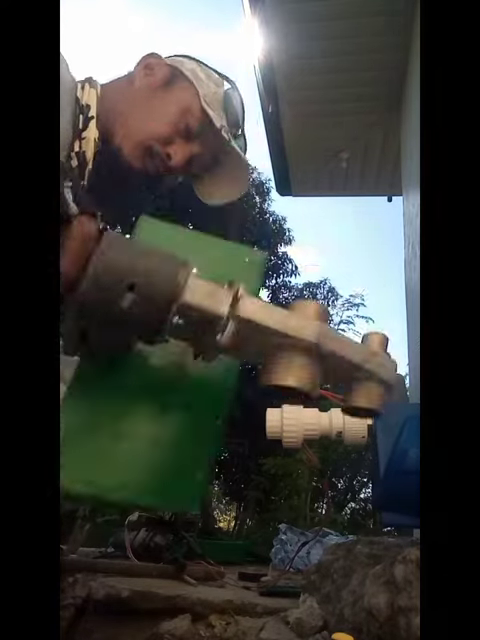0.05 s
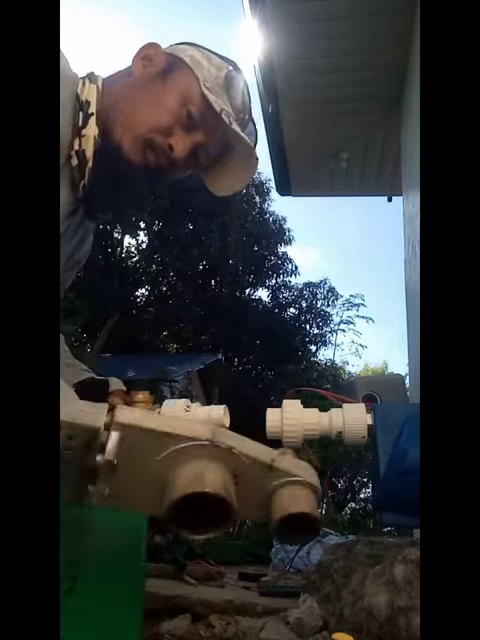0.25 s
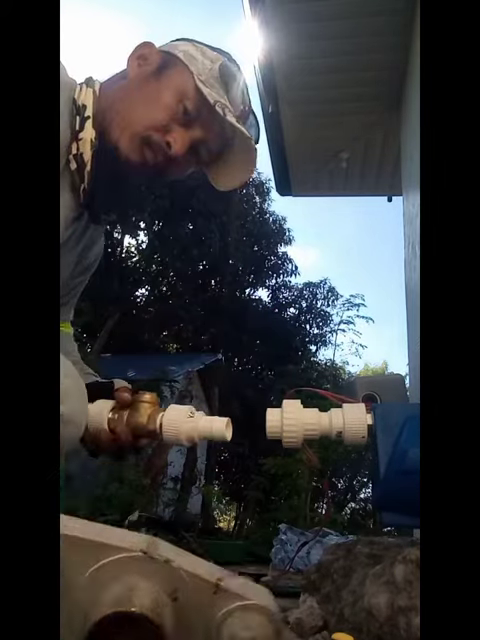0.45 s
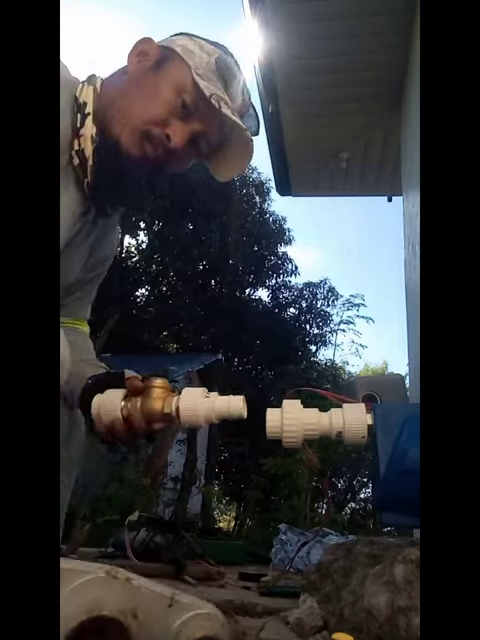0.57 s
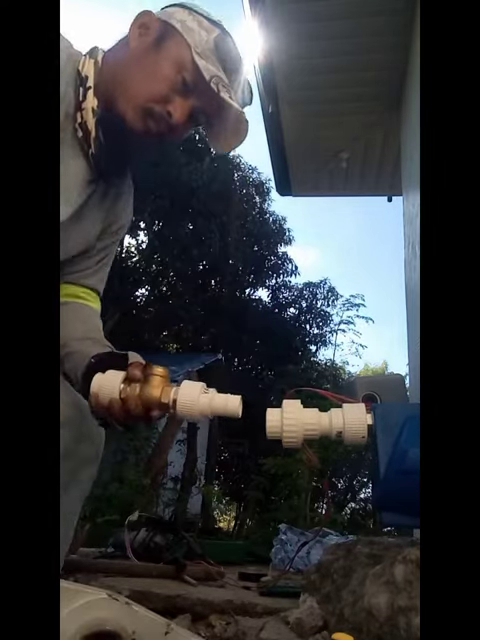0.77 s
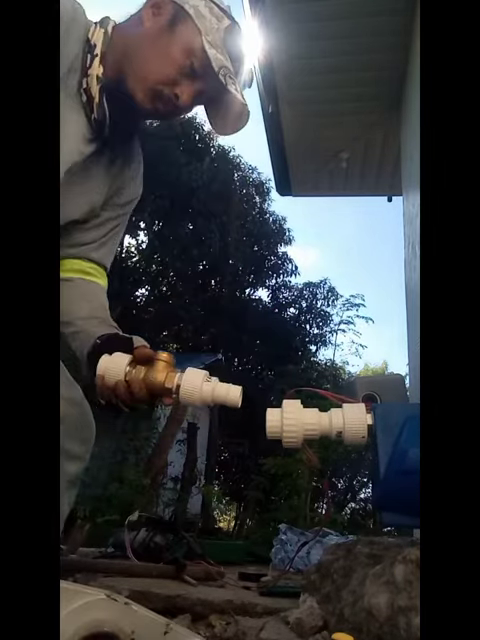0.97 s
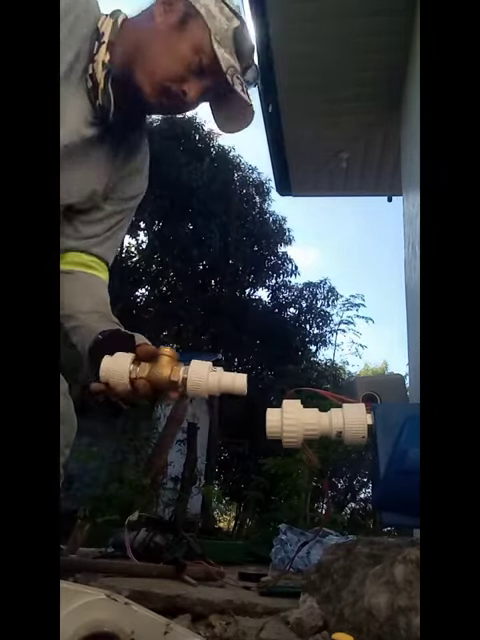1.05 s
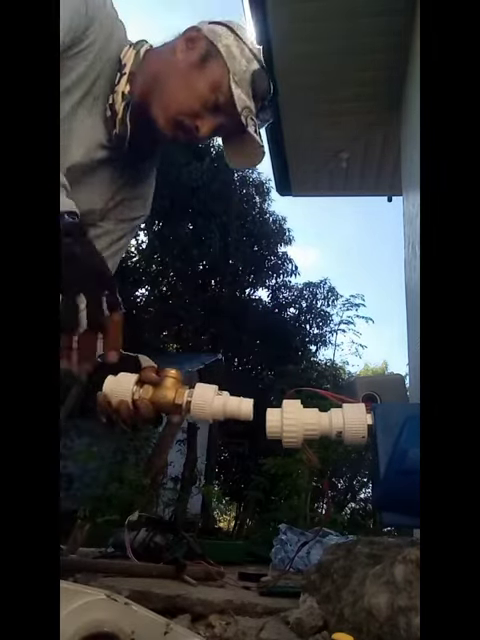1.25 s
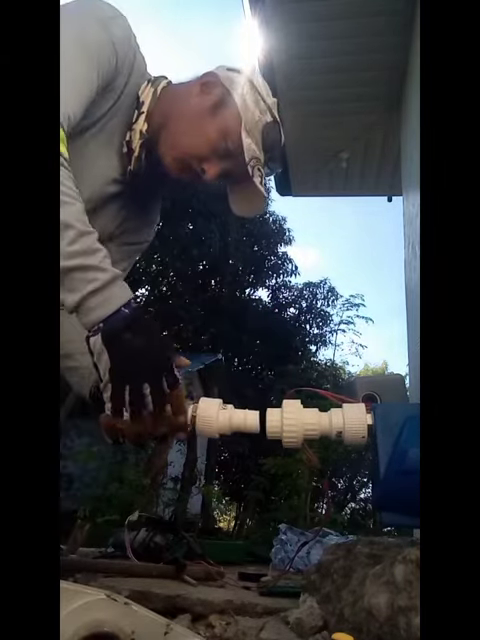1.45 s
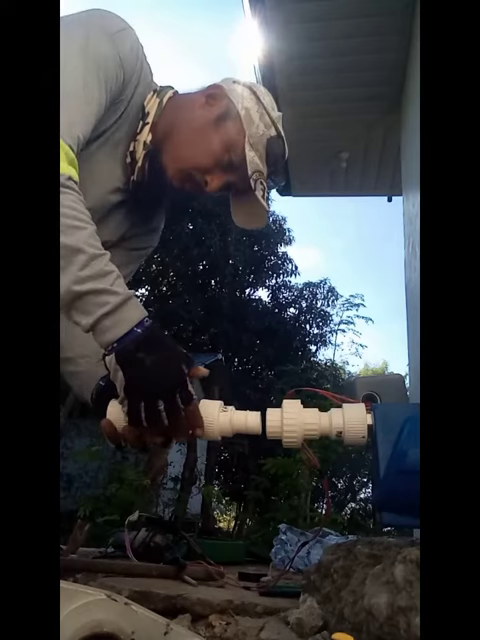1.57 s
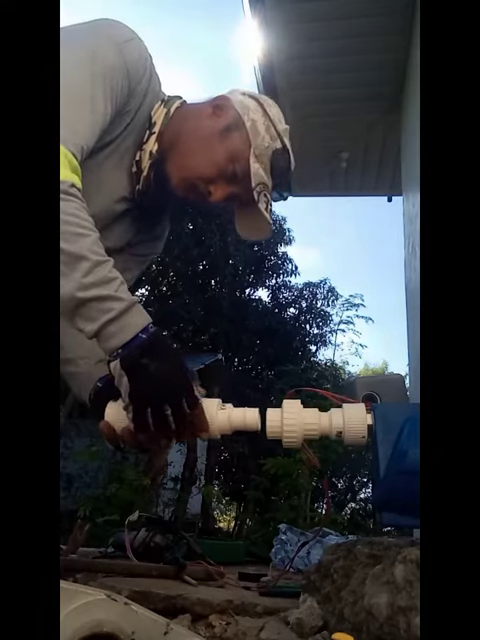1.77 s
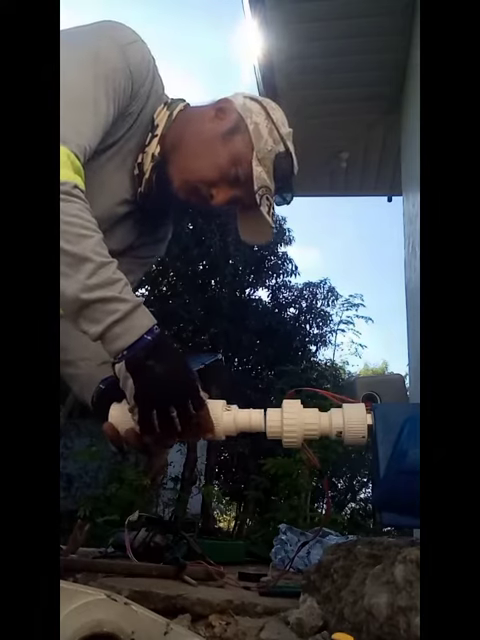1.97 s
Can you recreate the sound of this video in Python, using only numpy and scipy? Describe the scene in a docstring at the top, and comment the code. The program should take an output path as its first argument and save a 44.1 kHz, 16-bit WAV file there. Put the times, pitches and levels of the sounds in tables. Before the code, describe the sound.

Hard clattering knocks as a metal tool is set down among plastic pipes, over a faint engine hum

```python
"""A yard: a metal pipe-welding tool is set down among plastic pipes and fittings.
A light knock, two hard clatters, then smaller knocks: contacts crack and ring tool and pipes.
A far one-cylinder engine idles as a throbbing hum: regular firings through exhaust resonances.
A bird whistles twice and faint calls sound further off: wavering tones on pitch and level curves.
Behind lie shaped noise, a hiss that comes and goes, and a thin whine made of upper harmonics."""
import sys
import numpy as np
from scipy import signal
from scipy.fft import rfft, irfft
from scipy.io import wavfile

SR = 44100
rng = np.random.default_rng(int(sys.argv[2]) if len(sys.argv) > 2 else 0)


def unload_audio(sound):
    """Save the sound as a 16-bit wav file, at the path given as the first command line argument."""
    columns = np.transpose(np.atleast_2d(sound))
    # keep every value between -1 and 1, then stretch to whole-number steps
    steps = np.round(np.clip(columns, -1, 1) * 32767)
    wavfile.write(sys.argv[1], SR, steps.astype(np.int16))


N = 88200
T = np.arange(N) / SR


def from_db(db):
    """Decibels to amplitude gain."""
    return 10 ** (np.asarray(db) / 20)


def unit_energy(x):
    """Scale to an energy of one."""
    return x / np.sqrt(np.sum(x ** 2) + 1e-20)


def unit_rms(x):
    """Scale to an rms of one."""
    return unit_energy(x) * np.sqrt(len(x))


def decay(t60_s):
    """Exponential fade by 60 dB in t60_s."""
    return np.exp(-np.log(1000) * T / t60_s)


def convolve(x, response):
    """Play x through an impulse response."""
    return signal.fftconvolve(x, response)[:len(x)]


def filter_sos(x, order, edge_hz, kind="low"):
    """Butterworth filter."""
    return signal.sosfilt(signal.butter(order, edge_hz, kind, fs=SR, output="sos"), x)


def coloured_noise(spectrum):
    """Steady noise of unit rms; dB is interpolated over log frequency."""
    hz, db = np.transpose(spectrum)
    f = np.fft.rfftfreq(N, 1 / SR) + 0.00088  # keeps log(f) finite
    low_cut = np.minimum(f / hz[0], 1) ** 2
    gain = from_db(np.interp(np.log(f), np.log(hz), db)) * low_cut
    return unit_rms(irfft(rfft(rng.standard_normal(N)) * gain, N))


def drift(rate_hz):
    """Lowpassed random wander of unit rms."""
    return unit_rms(filter_sos(rng.standard_normal(N), 2, rate_hz))


YARD_T60_S, YARD_BUILDUP_S = 0.32, .006


def yard_echo(colour):
    """Diffuse echo from wall and eaves: noise that builds up, then decays."""
    buildup = 1 - np.exp(-(T / YARD_BUILDUP_S) ** 2)
    return unit_energy(colour * decay(YARD_T60_S) * buildup)


CONTACTS_PER_S, CONTACT_SPREAD_DB, FIRST_CONTACT_DB = 900, 3.5, 1
SWELL_DB, CHATTER_FALL_DB = 11, 6


def contacts(length_s, swell_s, count=72):
    """Uneven impulses of random sign: they swell from the first touch, then weaken."""
    jitter, size = rng.random(count), rng.standard_normal(count)
    sign = rng.choice([-1, 1], count)
    s = (np.arange(count) + jitter - jitter[0]) / CONTACTS_PER_S
    db = CONTACT_SPREAD_DB * np.clip(size, -2, 2) - CHATTER_FALL_DB * np.minimum(s / length_s, 1)
    db[0] = FIRST_CONTACT_DB
    db = db - SWELL_DB * np.clip((swell_s - s) / (abs(swell_s) + 1e-9), 0, 1)
    end_fade = np.clip((length_s - s) * CONTACTS_PER_S, 0, 1)
    return np.bincount((s * SR).astype(int), sign * from_db(db) * end_fade, SR // 2)[:SR // 2]


FAVOUR_DB, FAVOUR_OCTAVES = 9.5, 0.15


def struck_body(clicks, modes, favoured_hz):
    """Contacts drive two-pole resonators; modes near the favoured pitch ring louder."""
    ring = 0
    for hz, db, t60_s in modes:
        radius, angle = from_db(-60 / (t60_s * SR)), 2 * np.pi * hz / SR
        favour_db = FAVOUR_DB * np.exp(-(np.log2(hz / favoured_hz) / FAVOUR_OCTAVES) ** 2)
        poles = [1, -2 * radius * np.cos(angle), radius * radius]
        ring = ring + from_db(db + favour_db) * unit_energy(signal.lfilter([1, 1], poles, clicks))
    return unit_energy(ring)


# runs of contacts: t/s, length/s, swell/s, tool share/0-1, favoured f/Hz,
# then thud, knock, clack, tick level/dB (energy spread over LEVEL_SPAN_S)
KNOCKS = [ (0.1644, 0.0017, 0, 0.32, 857, -36, -36.5, -43.5, -61),
          (0.169, 0.0424, 0, 1, 399.6, -37.5, -41.5, -48.5, -73),
          (0.2343, 0.016, 0, 0.89, 4700, -20.5, -24.5, -15.5, -33),
          (.251, 0.016, 0.0012, 0.99, 266, -21.5, -22, -15, -25),
          (0.33, 0.033, 0, 0.6, 2280, -45, -47, -37.5, -75),
          (0.4212, 0.012, 0.0053, 0.53, 143, -18.5, -20, -25, -51.5),
          (0.428, 0.02226, 0.0035, 0, 1583, -25, -14, -13.5, -30.5),
          (0.501, 0.0199, 0.013, 0, 2920, -40.5, -34, -24.5, -47),
          (0.525, 0.01806, 0.0037, 0.4, 755, -42.5, -36.5, -34.5, -49),
          (0.5632, 0.00153, 0.037, 0.2, 3860, -38.5, -38.5, -36.5, -68),
          (0.572, 0.002, 0.0081, 0.62, 1410, -28, -29.5, -36, -50),
          (0.587, 0.019, 0, 0.34, 120, -36, -41, -40, -49),
          (.597, 0.014, .005, 0, 3760, -33.5, -29.5, -26.5, -42),
          (.606, 0.015, 0, 0, 2230, -62, -25.5, -23, -44),
          (0.62, 0.0149, 0.0033, 0.04, 750, -42, -32.5, -41, -70),
          (0.662, 0.0558, 0, 1, 707, -41.5, -39.5, -66, -78),
          (0.697, 0.00338, 0.0039, 0.05, 410, -39.5, -36.5, -46, -79),
          (.712, 0.013, 0.0027, 0.29, 2860, -45, -40.5, -37, -67),
          (0.822, 0.0043, 0, 0.45, 2250, -72, -56.5, -61.5, -83),
          (0.848, 0.0067, .004, 0, 2290, -68.5, -59, -55, -75),
          (0.903, 0.0051, 0, 0, 700, -61.5, -53, -63, -71.5),
          (0.921, 0.065, 0, .1, 447, -47, -50, -75, -80),
          (1.012, 0.012, 0.0038, 1, 636, -67.5, -56, -59, -70.5),
          (1.724, .025, 0.012, 0.95, 266, -61.5, -68.5, -71.5, -94),
          (1.838, 0.014, 0.016, .9, 266, -59.5, -69, -70.5, -90), ]
# edges of the thud, knock, clack, tick registers: f/Hz
REGISTER_EDGES_HZ = [75, 450, 1800, 5200, 16000]
# modes of the metal tool: f/Hz, relative level/dB, t60/s
TOOL_MODES = [(269.7, 0, .06), (379, -4, 0.15), (562, -0.5, .05), (672, 0, .11), (1495, -1, .06),
              (1980, -10.5, 0.14), (2380, -5, .05), (2724, -3.5, .14), (2846, -5, .06), (3118, -4.5, .08),
              (3680, -5.5, 0.24), (3750, -2.5, .15), (4636, -3.5, .06), (4880, -7.5, 0.086),
              (5660, -8, .14), (6207, -6, 0.13)]
# modes of the plastic pipes: f/Hz, relative level/dB, t60/s
PIPE_MODES = [(144, -0.5, .08), (434, -1.5, .08), (735.2, -6.5, 0.092), (855, -5, 0.087), (1492, -1, .04),
              (1605, -4.5, .04), (1950, -5.5, 0.18), (2253, 0.5, .11), (2690, -3.5, .09), (2870, -4, .1),
              (3443, -11.5, 0.11), (4250, -6.5, .06), (4920, -12.5, .09), (6200, -18.5, .09),
              (6880, -12.5, 0.15)]
# colour of one contact's crack: f/Hz, relative density/dB
CRACK_SPECTRUM = [(70, -11.5), (140, 4), (260, 3.5), (400, 3.5), (560, 2), (800, 1), (1150, -3),
                  (1600, -2.5), (2100, -1.5), (3000, -2.5), (5000, -14.5), (7000, -11.5), (9500, -29.5),
                  (15000, -31.5)]
CRACK_T60_S, CRACK_ECHO_DB, MODES_DB, LEVEL_SPAN_S = .022, -13.5, -1, .02


def knocks():
    """Contacts crack and ring tool and pipes; the spot hit weights four registers."""
    out = np.zeros(2 * N)
    bands = list(zip(REGISTER_EDGES_HZ, REGISTER_EDGES_HZ[1:]))
    for start_s, length_s, swell_s, share, favoured_hz, *levels_db in KNOCKS:
        share = np.clip(share, 0, 1)
        colour = coloured_noise(CRACK_SPECTRUM)
        clicks = contacts(length_s, swell_s)
        crack = unit_energy(colour * decay(CRACK_T60_S))
        crack = crack + from_db(CRACK_ECHO_DB) * yard_echo(colour[::-1])
        tool = np.sqrt(share) * struck_body(clicks, TOOL_MODES, favoured_hz)
        pipes = np.sqrt(1 - share) * struck_body(clicks, PIPE_MODES, favoured_hz)
        cracks = unit_energy(convolve(clicks, crack[:len(clicks)]))
        raw = cracks + from_db(MODES_DB) * (tool + pipes)
        hit = sum(from_db(db) * unit_energy(filter_sos(raw, 3, band, "band"))
                  for band, db in zip(bands, levels_db))
        start = int(start_s * SR)
        out[start:start + len(hit)] += hit * np.sqrt(LEVEL_SPAN_S * SR)
    return out[:N]


def ringing(modes):
    """Damped sines of alternating sign: one impulse response."""
    return sum((-1) ** k * from_db(db) * decay(t60_s) * np.sin(2 * np.pi * hz * T)
               for k, (hz, db, t60_s) in enumerate(modes))


# exhaust resonances: f/Hz, relative level/dB, t60/s
EXHAUST_MODES = [(100.5, -1.5, 0.18), (131, -7, 0.018)]
# low rumble: f/Hz, relative density/dB
RUMBLE_SPECTRUM = [(25, -21), (45, -2.5), (70, 6.5), (150, 15), (220, -12.5), (330, -8.5), (600, -45)]
FIRING_HZ, FIRST_FIRING_S, FIRING_SPREAD_DB = 15.93, .007, 0.65
BASS_CUT_HZ, MUFFLER_HZ = 45, 192
ENGINE_DB, RUMBLE_DB = -50.5, -55.5


def engine(count=36):
    """Each firing thumps the exhaust, only bass carries this far; rumble lies under it."""
    at = ((FIRST_FIRING_S + np.arange(count) / FIRING_HZ) * SR).astype(int)
    firing_gain = from_db(FIRING_SPREAD_DB * rng.standard_normal(count))
    firings = np.bincount(at, firing_gain, N)[:N]
    thumps = convolve(firings, ringing(EXHAUST_MODES))
    thumps = filter_sos(thumps, 2, [BASS_CUT_HZ, MUFFLER_HZ], "band")
    return from_db(ENGINE_DB) * unit_rms(thumps) + from_db(RUMBLE_DB) * coloured_noise(RUMBLE_SPECTRUM)


def tone(curve, waver, flutter_db, partials=((1, 0),)):
    """Harmonics on a pitch and level curve; pitch wavers and level flutters at random."""
    s, hz, db = np.transpose(curve)
    pitch_hz = np.interp(T, s, hz) * (1 + waver * drift(86.3))
    phase = 2 * np.pi * np.cumsum(pitch_hz) / SR
    level = from_db(np.interp(T, s, db) + flutter_db * drift(45))
    level = level * (T >= s[0]) * (T <= s[-1])
    harmonics = sum(from_db(k_db) * np.sin(round(k) * phase) for k, k_db in partials)
    return np.sqrt(2) * level * harmonics


# bird whistles, one curve each: t/s, f/Hz, level/dB
WHISTLES = [
    [(1.44, 2280, -79.5), (1.465, 2340, -58.5), (1.505, 2350, -60.5), (1.522, 2347, -47.5),
     (1.568, 2325, -58.5), (1.614, 2367, -58), (1.68, 2330, -75), (1.8, 2335, -69.5), (2, 2360, -63)],
    [(1.825, 2440, -68), (1.845, 2490, -64.5), (1.872, 2585, -56.5), (1.925, 2609, -39),
     (1.98, 2614, -45.5), (2, 2604, -49.5)],
]
# faint far calls, perhaps poultry: t/s, fundamental f/Hz, level/dB
FAR_CALLS = [
    [(1.13, 697.6, -70), (1.175, 750, -56), (1.22, 714, -62), (1.27, 744, -60.5), (1.42, 793, -78),
     (1.48, 794.4, -89)],
    [(1.6, 658, -81), (1.71, 630, -65), (1.85, 624.9, -68.5), (2, 620.5, -76.5)],
]
# harmonics of the far calls: multiple, relative level/dB
FAR_PARTIALS = [(1, -1.5), (2, -14)]
# wavers are rms fractions of the pitch
BIRD_WAVER, BIRD_FLUTTER_DB, BIRD_ECHO_DB, FAR_WAVER = 0.0034, 3.93, -20, 0.0183


def birds():
    """Two pure whistles with a yard echo, plus faint dry calls further away."""
    near = sum(tone(c, BIRD_WAVER, BIRD_FLUTTER_DB) for c in WHISTLES)
    far = sum(tone(c, FAR_WAVER, flutter_db=1.5, partials=FAR_PARTIALS) for c in FAR_CALLS)
    echo = convolve(near, yard_echo(rng.standard_normal(N)))
    return near + from_db(BIRD_ECHO_DB) * echo + far


# thin whine, probably a small motor spinning up and down: t/s, fundamental f/Hz, level/dB
WHINE = [(.82, 1650, -98), (.9, 1940, -95), (.95, 2040, -80.5), (1.0, 2245, -80), (1.03, 2220, -77),
         (1.06, 2110, -82), (1.11, 2060, -79), (1.2, 1480, -91), (1.32, 1240, -90)]
# its harmonics, the fundamental is silent: multiple, relative level/dB
WHINE_PARTIALS = [(3, -4), (4, -4), (5, 0), (6, -18), (7, -12)]


def whine():
    """Upper harmonics of a pitch that rises, then falls."""
    return tone(WHINE, waver=0.0042, flutter_db=4.0, partials=WHINE_PARTIALS)


# distant murmur of the air: t/s, level/dB
AIR_LEVEL = [(0, -55), (.7, -52), (1.03, -57.5), (1.26, -60.5), (1.5, -65), (1.7, -61), (2, -66)]
# its colour: f/Hz, relative density/dB
AIR_SPECTRUM = [(150, -7), (230, -20), (320, -7.5), (420, -9.5), (520, -9), (640, 1), (760, -4.5),
                (950, -12.5), (1350, -2.5), (1750, -11.5), (2400, -5), (2950, -12), (3300, -12),
                (3900, -13.5), (5100, -27), (7000, -41), (8500, -37.5), (15500, -45.5)]
# distant hiss: t/s, level/dB
HISS_LEVEL = [(0, -73.5), (.55, -55.5), (.78, -87), (.93, -67.5), (1.13, -69.5), (1.3, -84.5), (1.45, -88),
              (2, -96)]
# its colour: f/Hz, relative density/dB
HISS_SPECTRUM = [(3000, -2), (4200, 7), (5200, 1), (6800, 10), (8000, -14), (10500, -20.5), (15000, -24.5)]


def air():
    """Outdoor murmur and hiss: coloured noises on level curves."""
    murmur = from_db(np.interp(T, *np.transpose(AIR_LEVEL))) * coloured_noise(AIR_SPECTRUM)
    hiss = from_db(np.interp(T, *np.transpose(HISS_LEVEL))) * coloured_noise(HISS_SPECTRUM)
    return murmur + hiss


def scene():
    """Knocks close by over the sounds of the yard."""
    return (knocks() + engine() + birds() + whine() + air())[None]


CUTOFF_HZ = 15800


def record(dry):
    """Tanh rounds the peaks; a steep lowpass cuts the top."""
    ceiling = 1.2
    lowpass = signal.ellip(10, .1, 70, CUTOFF_HZ, fs=SR, output="sos")
    return signal.sosfilt(lowpass, ceiling * np.tanh(dry / ceiling))


dry = scene()
out = record(dry)
unload_audio(out)
```